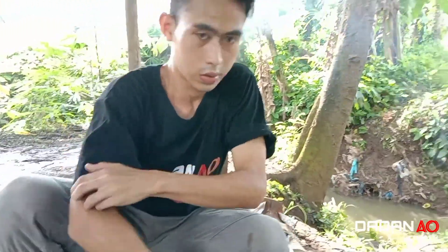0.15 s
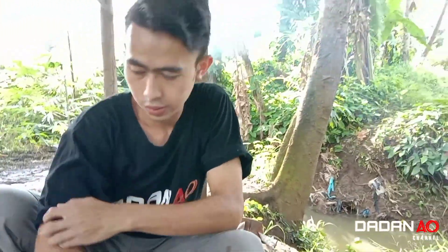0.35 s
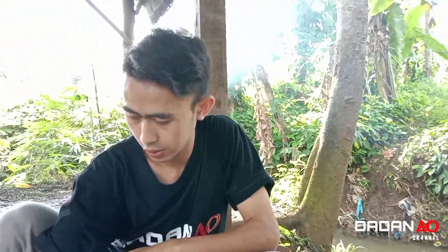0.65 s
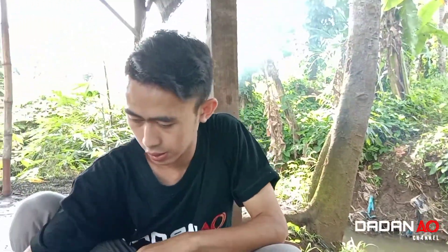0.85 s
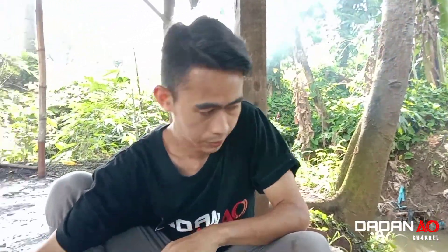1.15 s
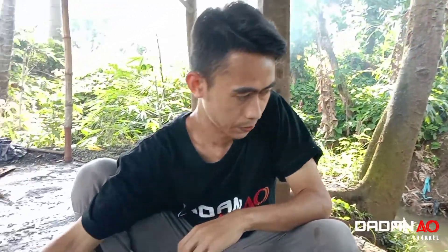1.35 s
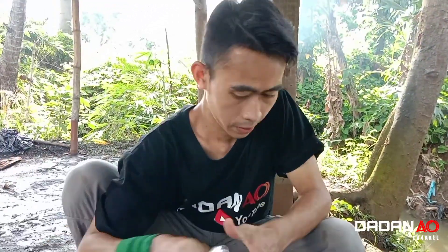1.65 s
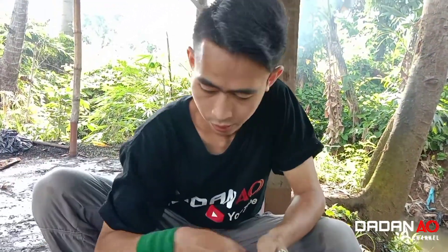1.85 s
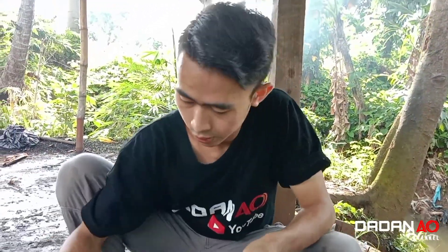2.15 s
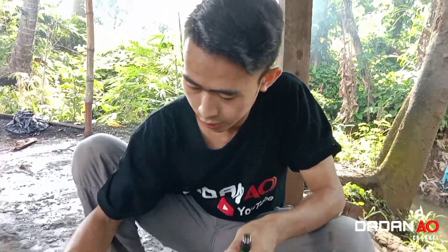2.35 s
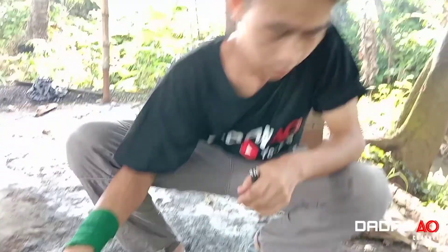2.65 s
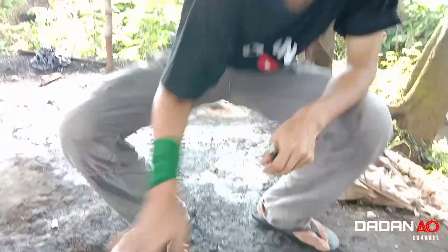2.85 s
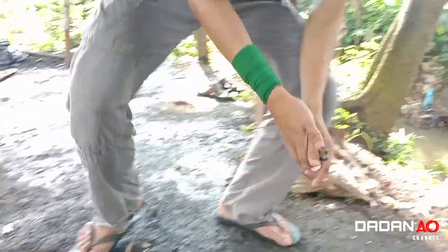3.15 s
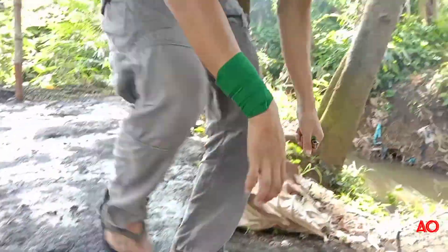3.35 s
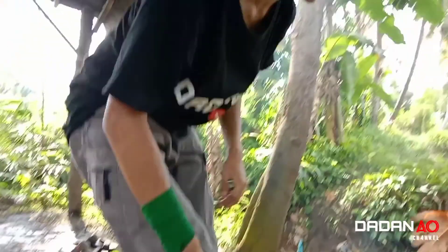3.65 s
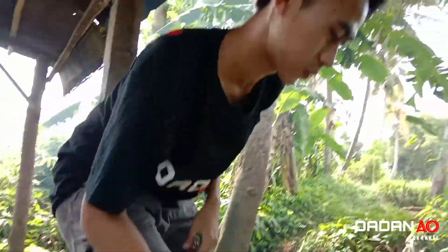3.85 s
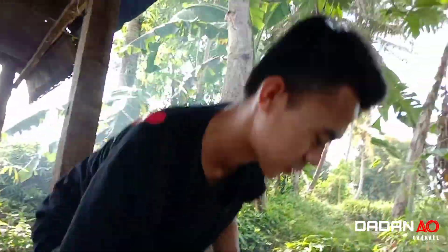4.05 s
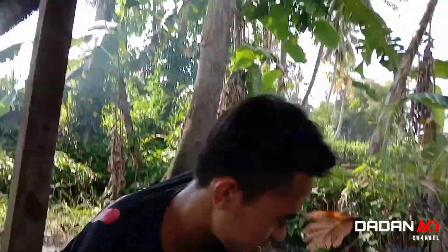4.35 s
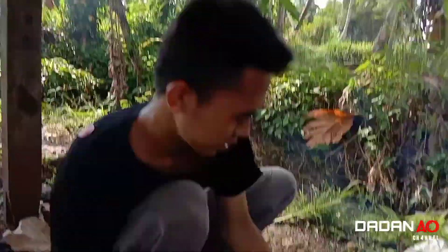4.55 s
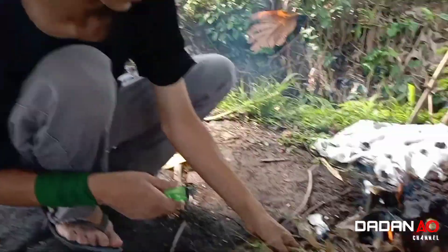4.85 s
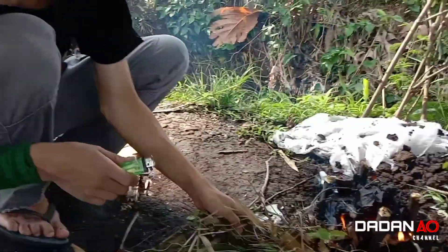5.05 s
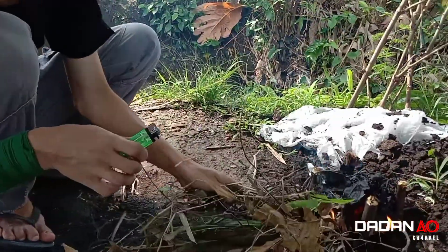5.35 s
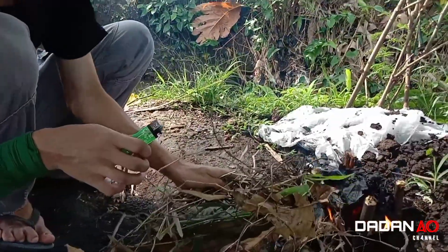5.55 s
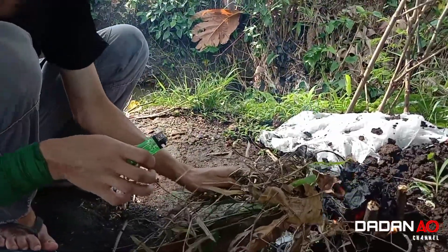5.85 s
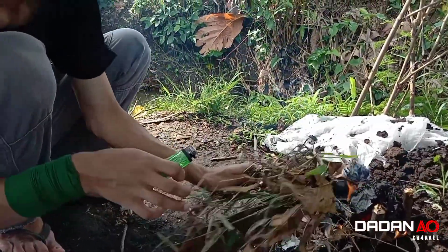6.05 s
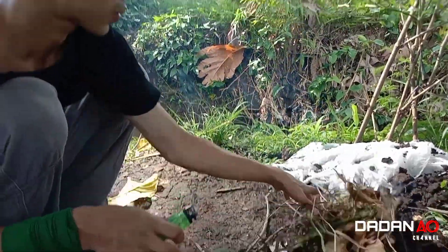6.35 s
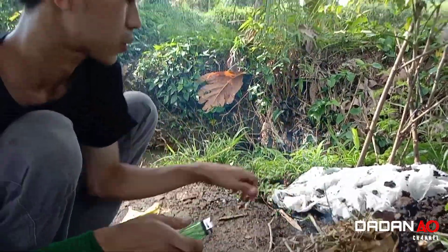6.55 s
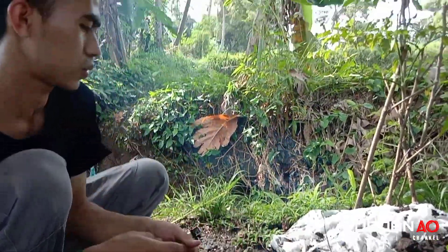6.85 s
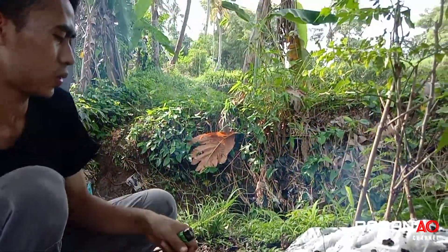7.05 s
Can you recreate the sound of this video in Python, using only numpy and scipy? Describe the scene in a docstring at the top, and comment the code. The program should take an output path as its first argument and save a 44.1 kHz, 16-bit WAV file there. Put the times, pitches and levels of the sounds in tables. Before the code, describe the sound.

Close to a hand-held camera under an open shelter, a dry twig cracks and fingers bump the case. Sticks knock hollowly, followed by a quieter spell of tiny snaps and faint litter rustle. Then sharp cracks burst out, and a bundle of twigs and leaves is crunched and pushed over soil with a short high squeak, ending in small ticks over thin garden hiss.

```python
"""Under an open shelter, close to the microphone of a hand-held camera, over a garden's high hiss and quiet air.
First fingers rub and bump the case and a dry twig cracks; then kindling is picked up and sticks knock together.
A few steps stir the litter among small snaps; a bundle of twigs and leaves is gripped and crushed, then pushed
along the ground, where a stalk squeaks. Breaks, blows, slips and rustles are random tiny fractures, filtered;
the rings and the squeak are sines, hiss and air are noise, and the shelter answers with a short tail."""
import sys
import numpy as np
from scipy import signal
from scipy.fft import rfft, irfft, next_fast_len
from scipy.io import wavfile
from scipy.ndimage import uniform_filter1d, map_coordinates

SR = 44100
rng = np.random.default_rng(int(sys.argv[2]) if len(sys.argv) > 2 else 0)


def store_pcm(level_fs):
    """Save levels as 16-bit WAV."""
    pcm = np.round(np.clip(level_fs, -1, 1) * 32767).astype(np.int16)
    wavfile.write(sys.argv[1], SR, np.atleast_2d(pcm).T)


N = 317520  # samples

# The garden's high hiss. Each row: time in seconds, level in dB before trim and flutter.
HISS_LEVEL = [(0.0, -55.5), (0.32, -49.5), (0.55, -60.5), (0.82, -61.5), (1.02, -53), (1.181, -65.5),
              (1.77, -59), (2.15, -67), (2.5, -58.5), (2.95, -60.5), (3.331, -53), (4.05, -67.5),
              (4.45, -64), (7.2, -63)]
# Colour of the hiss. Each row: frequency in Hz, relative level in dB.
GARDEN_SPECTRUM = [(3800, -18), (4400, -19.5), (5300, 8), (6600, 5.5), (7600, -3.5), (9000, -12.5),
                   (12500, -18.5), (15500, -22)]
# Colour of the still air. Each row: frequency in Hz, relative level in dB.
AIR_SPECTRUM = [(20, -40), (60, -9.5), (120, -4), (220, -8), (500, -20.5), (1100, -18), (1900, -12.5),
                (2350, -38), (3300, -34.5), (4200, -36.5), (6000, -57.5)]
# Skin dragging on the camera. Each row: start in seconds, length in seconds, rms level in dB before trim,
# pitch of the case in Hz.
RUBS = [(0.016, 0.062, -59.5, 302), (0.337, 0.04, -42, 573), (.865, 0.066, -53, 134),
        (1.271, 0.052, -57.5, 207), (3.153, .12, -45, 760), (3.224, 0.047, -39, 380),
        (3.222, 0.046, -52, 119), (3.266, 0.052, -55.5, 500), (4.515, 0.017, -34.5, 153),
        (4.539, 0.025, -43, 91), (5.105, .05, -30, 370), (5.118, .04, -33, 1100)]
# Fingers bumping the camera. Each row: time in seconds, level in dB before trim, pitch of the case in Hz.
BUMPS = [(.325, -16.5, 450), (.336, -25, 450), (.378, -37, 480), (.463, -30.5, 880), (.508, -36.5, 660),
         (1.145, -31.5, 410), (3.152, -31, 649), (5.104, -19, 900), (5.133, -23, 230), (5.378, -23.5, 217),
         (6.566, -30, 200), (7.122, -42, 330)]
# Decay of the shelter's tail. Each row: frequency in Hz, time to fall 60 dB in seconds.
SHELTER_DECAY = [(150, .2), (1000, 0.14), (6000, 0.18), (15000, 0.025)]
# Twigs cracking. Each row: time in seconds, overall level in dB, then woody body and airy top,
# each in dB relative to that level before trim.
SNAPS = [(0.1483, -14, -13, -16.5), (1.102, -32.5, -28, -10), (1.6504, -38.5, -12.5, -7.5),
         (1.7733, -42, -32, -19), (1.9052, -42.5, -27, -13.5), (2.788, -38.5, -30, -7),
         (2.861, -37, -30, -7), (2.888, -44, -31, -5), (3.055, -42.5, -29, -7.5), (3.092, -40.5, -25, -9),
         (3.349, -35, -14, -15.5), (3.4165, -41, -16, -13.5), (3.492, -26.5, -24.5, -17.5),
         (3.742, -45, -9, -5.5), (3.852, -39, -15, -5.5), (3.9498, -38.5, -4.5, -13),
         (4.502, -16.5, -10, -5.5), (4.511, -21.5, -15, -1.5), (4.521, -21, -9.5, -13),
         (4.577, -28.5, -22, -3.5), (4.6287, -33, -38, -7.5), (4.899, -22.5, -9.5, -15.5),
         (5.007, -29.5, -23.5, -22), (5.2117, -26, -8.5, -19), (5.5886, -35, -11, -11.5),
         (5.8967, -29.5, -24.5, -11), (6.3071, -20, -14.5, -7.5), (6.8405, -43, -13, -10.5),
         (6.915, -40.5, -18, -17), (7.0534, -38.5, -32, -5.5), (7.1624, -44.5, -15.5, -4)]
# Colour of breaking twigs. Each row: frequency in Hz, relative level in dB.
TWIG_SPECTRUM = [(100, -44), (400, -20), (700, -10.5), (1200, -13), (1750, -7.5), (2400, -17), (3400, -5),
                 (4100, -12.5), (5000, -0.5), (6200, 2), (7200, -6), (8800, -16), (12000, -8.5),
                 (15500, -16.5)]
# Sideways spread approached by the biggest snaps. Each row: frequency in Hz, side minus mid in dB.
WIDTH = [(2800, -49.5), (4500, -17.5), (6000, -17), (9000, -7), (14000, -14.5)]
# How hard leaves and twigs are worked in each movement. Each row: time in seconds, effort in dB.
PICK_UP = [(0.81, -61), (0.88, -48.5), (1.0, -48.5), (1.14, -50.5), (1.21, -64)]
STEPS = [(2.95, -73), (3.2, -55), (3.39, -60.5), (3.62, -61), (3.78, -54), (4.05, -79)]
GRIP = [(4.56, -40), (4.74, -56.5), (4.8, -37), (5.08, -38.5), (5.46, -43), (5.56, -49), (5.8, -43),
        (5.87, -52), (6.02, -49.5)]
PUSH = [(6.02, -49), (6.14, -35.5), (6.35, -32), (6.41, -26.5), (6.5, -39.5), (6.6, -40), (6.66, -52.5),
        (6.78, -68)]
# The movements. Each row: effort curve, crackle in dB, boost of the airy top in dB at firm effort,
# scrape on the soil in dB, effort in dB about which the stalks start to slide.
MOVES = [(PICK_UP, -2, -6, 1.1, -52.5), (STEPS, -6.5, 3, -11, -59), (GRIP, -1.2, 0.91, -4.5, -43),
         (PUSH, 0, 0, -5.5, -47)]
# Colour of crackling leaves. Each row: frequency in Hz, relative level in dB.
LEAVES_SPECTRUM = [(900, -33.5), (2200, -19.5), (3400, -5), (4100, -9.5), (5100, 1.5), (6400, 0),
                   (7300, -4), (8500, -13.5), (10000, -18.5), (12000, -13.5), (15500, -21)]
# Colour of stalks scraping over soil. Each row: frequency in Hz, relative level in dB.
SCRAPE_SPECTRUM = [(40, -28), (140, -7), (300, -21), (430, -19), (620, -2), (1150, 0), (1700, -3),
                   (2400, -16), (3500, -9), (5000, -31.5)]
# Sticks striking each other; the faint row at 4.396 s is instead a small twig giving a bright tick, played the
# same way. Each row: time in seconds, overall level in dB, then hollow ring and bark crack, each in dB relative
# to that level before trim, pitch of the stick in Hz.
KNOCKS = [(1.017, -19.5, -8.5, 1.5, 1110), (1.502, -21, -2, -8, 1550), (1.559, -24, -3, -20.5, 1320),
          (1.589, -29.5, -2, -1, 1560), (1.604, -25.5, -5, -8.5, 890), (2.263, -51, -4, -20, 1310),
          (2.515, -45, 6.5, -17, 750), (2.539, -34, -3, -15, 820), (2.603, -52.5, 7, -15, 985),
          (3.704, -38, -35, -11, 1140), (4.396, -60, -26, 26.5, 2970), (4.905, -20, -14, -12, 1340),
          (5.032, -17, -43.5, -4.5, 870), (5.044, -25.5, -33, -12, 2110)]
# Hollow ring of a stick before random spread. Each row: frequency in Hz, level in dB,
# time to fall 60 dB in seconds.
STICK_MODES = [(150, 3.5, 0.11), (286, 10, 0.091), (899, 2.5, 0.082), (1480, -1, 0.031)]
# Colour of the clack of wood. Each row: frequency in Hz, relative level in dB.
WOOD_SPECTRUM = [(50, -44), (200, -11), (500, -2.5), (900, 0.5), (1500, 3), (2100, -3.5), (2800, -8),
                 (4000, -38), (8000, -48.5)]
# Colour of the crack of bark. Each row: frequency in Hz, relative level in dB.
BARK_SPECTRUM = [(1200, -36.5), (2200, -14.5), (2900, -8.5), (3600, 1), (4500, 1), (5800, 10.5), (7000, -6),
                 (8500, -13), (15500, -24)]

RUB_SAG_DB, RUB_RELEASE_S = -4.5, 0.05  # pressure eases over a drag; 60 dB fall once the finger lifts
LEAD = SR // 100  # samples of straining before a break or blow
THIN_TWIG_DB, THICK_TWIG_DB = -38.5, -20  # reference levels of a thin and a thick break
STRAY_FROM_S, STRAY_TO_S = 2.8, 7.1  # tiny twigs give way at random between these times
STRAY_DB, STRAY_SPREAD_DB = -52, 5.5  # mean and spread of their levels
STRAY_BODY_DB, STRAY_TOP_DB = -22.5, -4.5  # as in the columns of SNAPS
SLIDE_DB = 7  # how gradually, in effort, sticking turns into sliding
REBOUND_S, REBOUND_DB = 0.014, -17.5  # a struck stick comes back once, more weakly
SQUEAK_S, SQUEAK_DB, SQUEAK_HOLD_S = 6.247, -23, 0.008  # full strength, before wobble, from this time
SQUEAK_RISE_S, SQUEAK_FALL_S = 0.062, 0.025  # time for 60 dB
SQUEAK_HZ = 2563  # mean fundamental
TOP_HZ = 15800  # the camera's band limit


def amp(db):
    """Decibels to gain."""
    return 10 ** (np.asarray(db) / 20)


def unit(x):
    """Scale to rms 1."""
    return x / np.sqrt(np.mean(x ** 2) + 1e-20)


def crest(x, size=132):
    """Scale so that the loudest 3 ms have rms 1."""
    return x / np.sqrt(uniform_filter1d(x ** 2, size).max() + 1e-20)


def along(points, hz):
    """Interpolate (Hz, value) points on a log frequency axis."""
    f, v = np.transpose(points)
    return np.interp(np.log(hz + 1), np.log(f + 1), v)


def curves(rows):
    """One dB curve per level column, silent outside the rows."""
    s, *cols = np.transpose(rows)
    t = np.arange(N) / SR
    return [np.interp(t, s, c, left=-np.inf, right=-np.inf) for c in cols]


def wobble(rate, n):
    """A smooth random curve, rate knots a second."""
    knots = rng.standard_normal(int(n * rate / SR) + 4)
    return map_coordinates(knots, [np.arange(n) * rate / SR])


def colour(x, gain):
    """Causal minimum-phase filter whose magnitude is gain(Hz)."""
    m = 2 * next_fast_len(len(x) // 2 + 2048)
    magnitude = np.maximum(gain(np.fft.rfftfreq(m, 1 / SR)), 1e-6)
    # folding the cepstrum onto positive times makes the response causal
    cepstrum = irfft(np.log(magnitude), m)
    cepstrum[1:m // 2] *= 2
    cepstrum[m // 2 + 1:] = 0
    return irfft(rfft(x, m) * np.exp(rfft(cepstrum)), m)[:len(x)]


def shaped(x, spectrum, lo_hz=1, hi_hz=SR, order=12):
    """Send x through a spectrum, kept between two edges."""
    def gain(hz):
        low_edge = 1 + (lo_hz / (hz + 1)) ** order
        high_edge = 1 + (hz / hi_hz) ** order
        return amp(along(spectrum, hz)) / low_edge / high_edge
    return colour(x, gain)


def grit(n, rate, spread_db):
    """Tiny fractures at random moments, rate a second on average, of unequal size."""
    happens = rng.random(n) < rate / SR
    size_db = spread_db * np.clip(rng.standard_normal(n), -2, 2)
    return happens * rng.choice([-1, 1], n) * amp(size_db)


def fade(t, t60):
    """Exponential decay, 60 dB in t60 seconds."""
    return np.exp(-np.log(1000) * t / t60)


def add(track, s, x):
    """Mix x into the track from time s."""
    at = max(round(s * SR), 0)
    track[at:at + len(x)] += x[:N - at]


def patchy(x, depth_db, order=3, size=5):
    """The colour shifts at random from moment to moment, in smooth patches of frequency and time."""
    z = signal.stft(x, nperseg=512)[2]
    field = rng.standard_normal(z.shape)
    field = uniform_filter1d(uniform_filter1d(field, order, 0), size, 1)
    return signal.istft(z * amp(depth_db * unit(field)), nperseg=512)[1][:N]


def own_modes(hz, depth_db):
    """Each piece has random resonances of its own, clearest low down and blurred in the treble."""
    ripple = map_coordinates(rng.standard_normal(128), [np.sqrt(hz) / 2])
    return amp(depth_db * ripple / np.hypot(1, hz / 6000))


def resonance(hz, pitch_hz, q):
    """Magnitude of one resonance, 1 at its peak."""
    return 1 / np.hypot(1, q * ((hz + 1) / pitch_hz - pitch_hz / (hz + 1)))


def garden(hiss_db=-1, air_db=-74, litter_db=-74):
    """A high noise hiss that swells and sinks and a faint stirring of leaf litter, over very quiet air."""
    s, level_db = np.transpose(HISS_LEVEL)
    flutter = amp(2.2 * wobble(32, N))
    swell = amp(np.interp(np.arange(N) / SR, s, level_db) + hiss_db) * flutter
    hiss = unit(shaped(patchy(rng.standard_normal(N), depth_db=2, size=7), GARDEN_SPECTRUM))
    air = unit(shaped(patchy(rng.standard_normal(N), depth_db=3.5, size=11), AIR_SPECTRUM))
    litter = amp(5 * wobble(40, N)) * grit(N, rate=1600, spread_db=1)
    litter = unit(shaped(patchy(litter, depth_db=6.5), TWIG_SPECTRUM))
    air_level = amp(air_db + 1.2 * wobble(16, N))
    return swell * hiss + amp(litter_db) * litter + air_level * air


def casing(x, pitch_hz, q, limit_hz, bass_hz=80):
    """The camera's case: one broad resonance, no deep bass, and little treble through soft skin."""
    def gain(hz):
        band = 1 / (1 + (hz / limit_hz) ** 9) / (1 + (bass_hz / (hz + 1)) ** 3)
        return resonance(hz, pitch_hz, q) * own_modes(hz, depth_db=4.5) * band
    return colour(x, gain)


def soften(x, corner_hz):
    """Soft skin dulls a touch gently above the corner."""
    return colour(x, lambda hz: 1 / np.hypot(1, hz / corner_hz))


def handling(bump_db=-2, rub_db=0, bump_corner=4.4, rub_corner=3.6):
    """Fingers bump the case once, or drag over it in uneven slips; skin corners are in multiples of the pitch."""
    out, t = np.zeros(N), np.arange(SR // 4) / SR
    for s, db, pitch_hz in BUMPS:
        push = 0.014 * grit(len(t), rate=3600, spread_db=1) * fade(t, t60=0.037)
        push[0] = -1  # the blow itself
        thud = soften(casing(push, pitch_hz, q=1.2, limit_hz=2380), bump_corner * pitch_hz)
        add(out, s + 0.001, amp(db + bump_db) * crest(thud))
    for start, length, db, pitch_hz in RUBS:
        pressure = amp(RUB_SAG_DB * t / length) * fade(np.maximum(t - length, 0), RUB_RELEASE_S)
        slips = grit(len(t), rate=700, spread_db=3.5) * pressure
        drag = soften(casing(slips, pitch_hz, q=2.7, limit_hz=2287), rub_corner * pitch_hz)
        add(out, start, amp(db + rub_db) * drag / np.std(drag[t < length]))
    return out


def shelter(x):
    """Roof, posts and ground answer after 5 ms with a short diffuse tail of decaying noise."""
    hz, t, z = signal.stft(rng.standard_normal(SR // 2), SR, nperseg=256)
    decay = fade(t, along(SHELTER_DECAY, hz)[:, None])
    tail = signal.istft(z * decay, SR, nperseg=256)[1]
    tail = tail / np.linalg.norm(tail)
    return signal.fftconvolve(x, np.pad(tail, (SR // 200, 0)))[:N]


def fracture(rate, first, t60, strain_db, rise_s):
    """Fibres strain and start to give, one breaks, and a dying run of small fractures follows."""
    t = np.arange(SR // 4) / SR
    strain = amp(strain_db) * fade(t[:LEAD][::-1], rise_s)
    strength = np.concatenate([strain, fade(t, t60)])
    train = grit(LEAD + len(t), rate, spread_db=7.5) * strength
    train[LEAD] = first
    return train


def strays(count=14):
    """Rows of tiny snaps at random moments, with the columns of SNAPS."""
    moments = rng.uniform(STRAY_FROM_S, STRAY_TO_S, size=count)
    levels_db = STRAY_DB + STRAY_SPREAD_DB * rng.standard_normal(count)
    return [(s, db, STRAY_BODY_DB, STRAY_TOP_DB) for s, db in zip(moments, levels_db)]


def snaps(body_db=-2.5, crack_db=-1, top_db=-1, modes_db=4.0, t60=0.067, growth=0.12,
          strain_db=-11, strain_growth=0.55):
    """Each twig breaks with woody body, sharp crack and fine splinters; thick ones strain more and tear longer."""
    out = np.zeros(N)
    for s, db, body, top in SNAPS + strays():
        tear_s = t60 * amp(growth * (db - THIN_TWIG_DB))
        strain = strain_db + strain_growth * (db - THICK_TWIG_DB)
        tear = fracture(rate=8300, first=4.9, t60=tear_s, strain_db=strain, rise_s=0.014)
        tear = colour(tear, lambda hz: own_modes(hz, modes_db))
        wood = amp(body + body_db) * crest(shaped(tear, TWIG_SPECTRUM, hi_hz=4030))
        crack = amp(crack_db) * crest(shaped(tear, TWIG_SPECTRUM, lo_hz=4480, hi_hz=8300))
        splinters = amp(top + top_db) * crest(shaped(tear, TWIG_SPECTRUM, lo_hz=7940))
        add(out, s - LEAD / SR, amp(db) * (wood + crack + splinters))
    return out


def bundle(tick_db=-1, stuck_share=0.17, brighten=0.23, firm_db=-37):
    """Leaves crackle in clumps and twigs tick, brighter with effort; with more effort stalks slide over soil."""
    out, t = np.zeros(N), np.arange(SR // 20) / SR
    clumps = amp(1.5 * wobble(50, N) + 1.5 * wobble(220, N))
    # each tick tears on briefly
    tick_starts = np.abs(grit(N, rate=70, spread_db=4.5))
    runs = signal.fftconvolve(tick_starts, fade(t, t60=0.024))[:N]
    ticks = unit(runs * grit(N, rate=7000, spread_db=3))
    leaves = unit(clumps * grit(N, rate=6500, spread_db=3.5))
    crackle = patchy(leaves + amp(tick_db) * ticks, depth_db=2.8)
    body = shaped(crackle, LEAVES_SPECTRUM, hi_hz=8040)
    top = shaped(crackle, LEAVES_SPECTRUM, lo_hz=8000)
    top = top / np.std(body)  # keeps its natural balance with the body
    body = unit(body)
    scrape = patchy(clumps * grit(N, rate=3000, spread_db=3), depth_db=5, order=2, size=8)
    scrape = unit(shaped(scrape, SCRAPE_SPECTRUM))
    for stroke, crackle_db, top_db, scrape_db, slide_db in MOVES:
        effort_db, = curves(stroke)
        slipping = (1 + np.tanh((effort_db - slide_db) / SLIDE_DB)) / 2  # 0 stuck, 1 sliding
        sliding = stuck_share + (1 - stuck_share) * slipping
        rustle = body + amp(top_db + brighten * (effort_db - firm_db)) * top
        out += amp(effort_db) * (amp(crackle_db) * rustle + amp(scrape_db) * sliding * scrape)
    return out


def hollow_ring(t):
    """A stick's modes as decaying sines, each a little off in pitch and level, swelling in after the blow."""
    ring = np.zeros(len(t))
    for hz, level_db, t60 in STICK_MODES:
        gain = amp(level_db + rng.normal(0, 8))
        ring += gain * np.sin(2 * np.pi * hz * rng.normal(1, 0.031) * t) * fade(t, t60)
    return crest(ring * (1 - fade(t, t60=0.045)))


def knocks(wood_db=-1, ring_db=-2, crack_db=-2, modes_db=4, focus_db=9, q=6):
    """A blow with short chatter and one rebound: a clack at the stick's own pitch, a hollow ring, a bark crack."""
    out, t = np.zeros(N), np.arange(SR // 4) / SR
    for s, db, hollow, bark, pitch_hz in KNOCKS:
        blow, rebound = (fracture(rate=3000, first=8, t60=0.065, strain_db=-10, rise_s=0.035)
                         for _ in range(2))
        late = np.pad(rebound, (round(REBOUND_S * SR), 0))[:len(blow)]
        blow = blow + amp(REBOUND_DB) * late
        blow = colour(blow, lambda hz: own_modes(hz, modes_db))
        pitched = colour(blow, lambda hz: 1 + amp(focus_db) * resonance(hz, pitch_hz, q))
        clack = amp(wood_db) * crest(shaped(pitched, WOOD_SPECTRUM))
        crack = amp(bark + crack_db) * crest(shaped(blow, BARK_SPECTRUM))
        add(out, s - LEAD / SR, amp(db) * (clack + crack))
        add(out, s, amp(db + hollow + ring_db) * hollow_ring(t))
    return out


def envelope(t, rise_s, hold_s, fall_s):
    """Swell up to t = 0, hold, then die away."""
    return fade(np.maximum(-t, 0), rise_s) * fade(np.maximum(t - hold_s, 0), fall_s)


def squeak(fundamental_db=-11, fourth_db=-20, jitter=0.0083):
    """A dry stalk sticks and slips: an unsteady tone of three harmonics, strongest on the second."""
    phase = 2 * np.pi * np.cumsum(SQUEAK_HZ * (1 + jitter * wobble(500, N))) / SR
    tone = amp(fundamental_db) * np.sin(phase) + np.sin(2 * phase) + amp(fourth_db) * np.sin(4 * phase)
    slip = envelope(np.arange(N) / SR - SQUEAK_S, SQUEAK_RISE_S, SQUEAK_HOLD_S, SQUEAK_FALL_S)
    return slip * amp(SQUEAK_DB + 1.5 * wobble(180, N)) * unit(tone)


def spread(cracks, wide_db=-36):
    """Side signal: snaps smeared over 10 ms by noise, wider the bigger the break, mostly in the treble."""
    strength = np.sqrt(np.abs(uniform_filter1d(cracks ** 2, size=441)))
    flung = cracks * strength / (strength + amp(wide_db))
    scatter = rng.standard_normal(SR // 100)
    scatter = scatter / np.linalg.norm(scatter)
    return shaped(signal.fftconvolve(flung, scatter)[:N], WIDTH)


def scene(wet_db=-13, case_wet_db=-22):
    """Everything sits straight ahead of the microphone; only the snaps also spread to the sides."""
    cracks, fingers = snaps(), handling()
    kindling = cracks + knocks() + bundle() + squeak()
    answer = shelter(amp(wet_db) * kindling + amp(case_wet_db) * fingers)
    mid = kindling + fingers + answer + garden()
    side = spread(cracks)
    return np.array([mid + side, mid - side])


def record(dry):
    """The camera keeps nothing above its band limit."""
    m = next_fast_len(N + SR // 2)
    kept = np.fft.rfftfreq(m, 1 / SR) < TOP_HZ
    return irfft(rfft(dry, m) * kept, m)[:, :N]


dry = scene()
out = record(dry)
store_pcm(out)
```